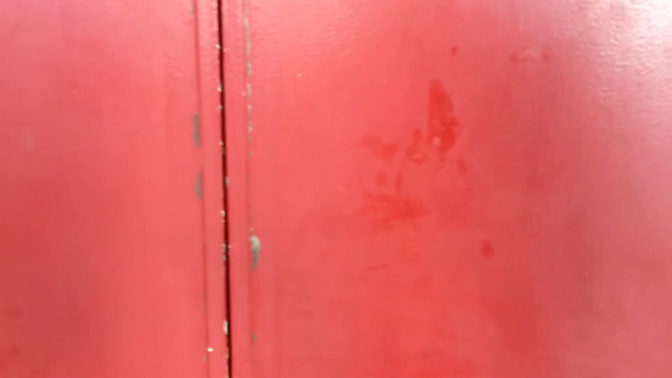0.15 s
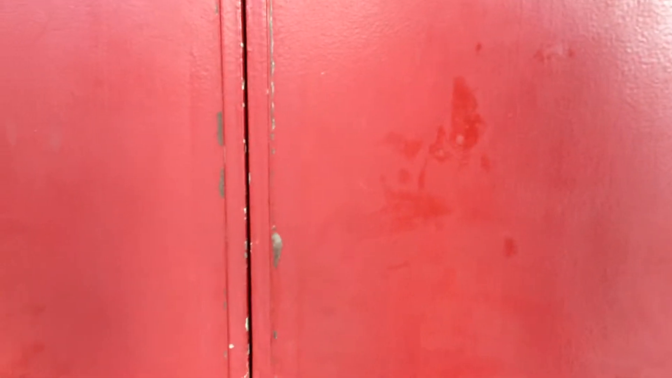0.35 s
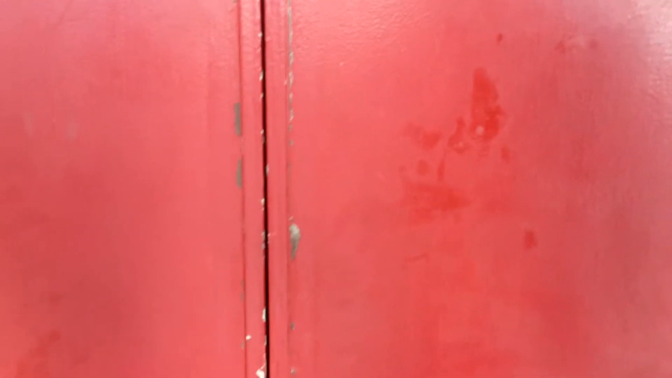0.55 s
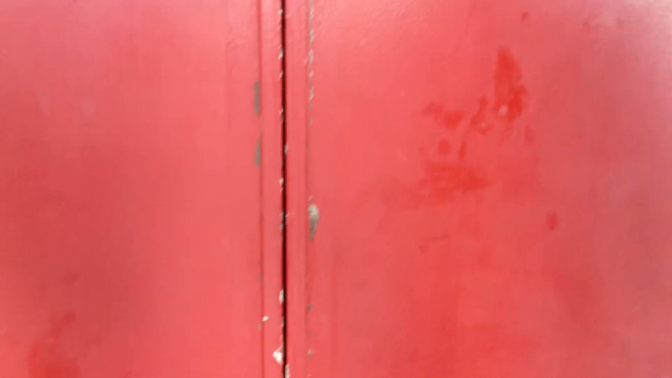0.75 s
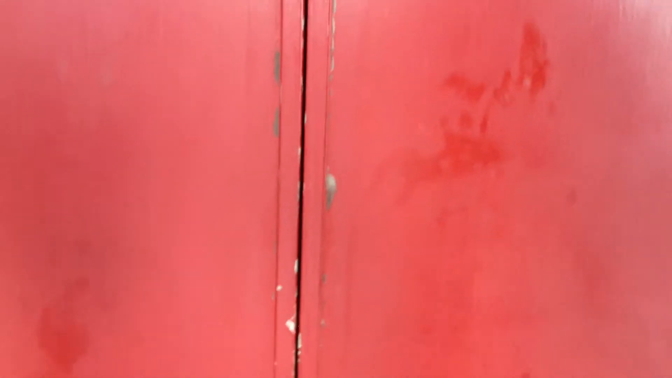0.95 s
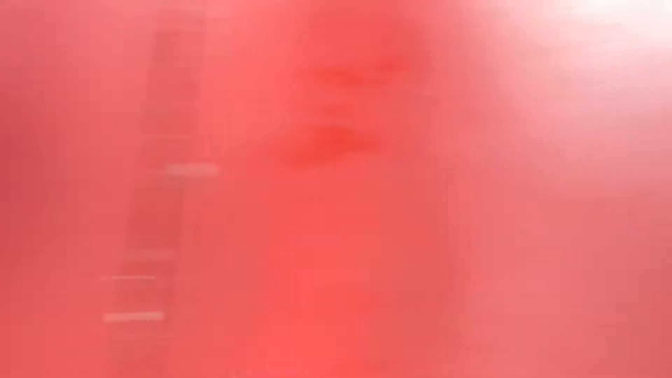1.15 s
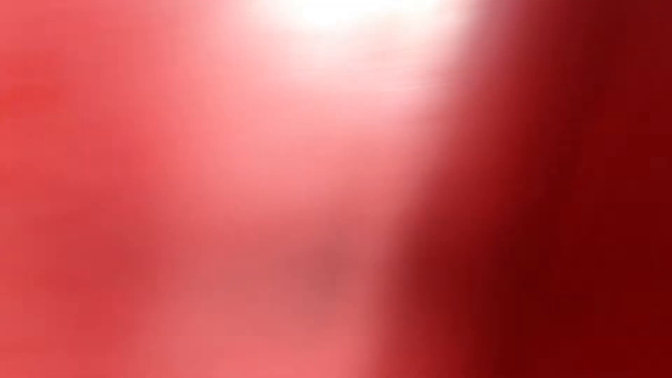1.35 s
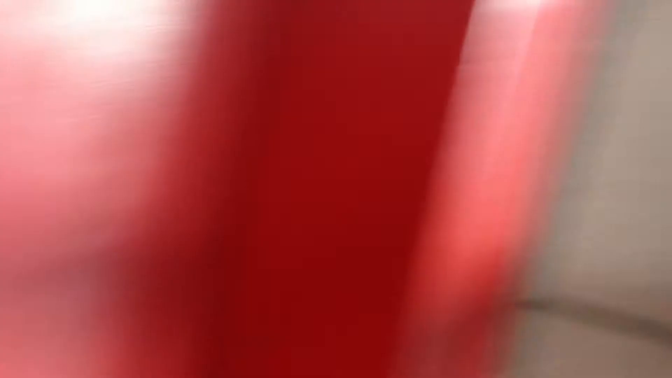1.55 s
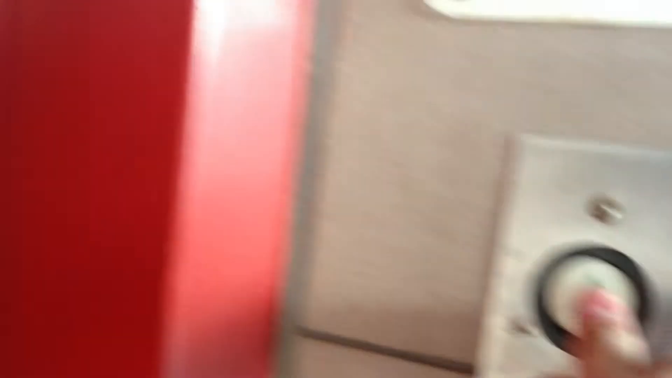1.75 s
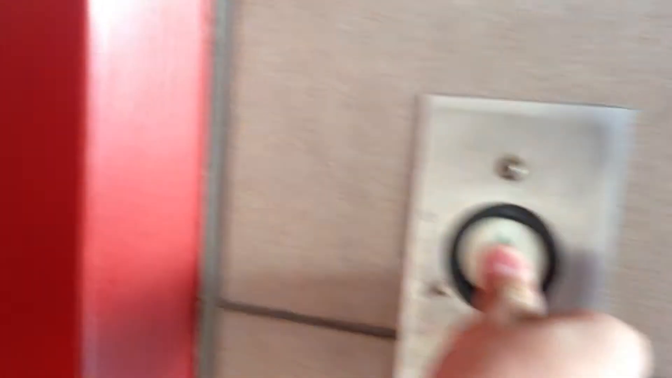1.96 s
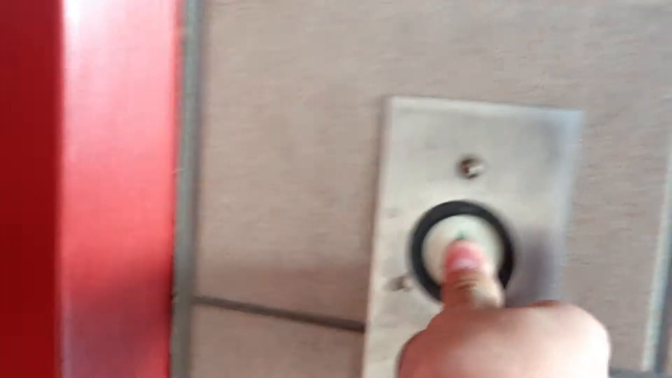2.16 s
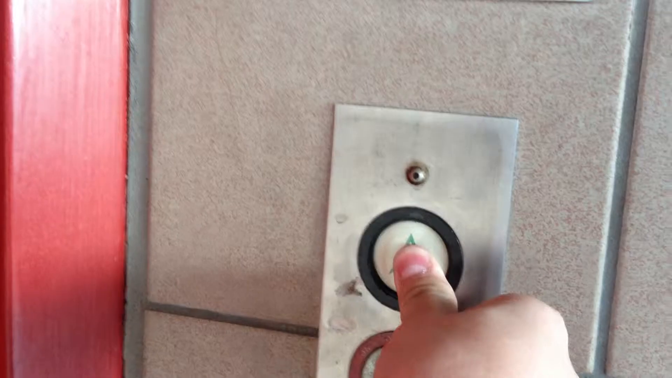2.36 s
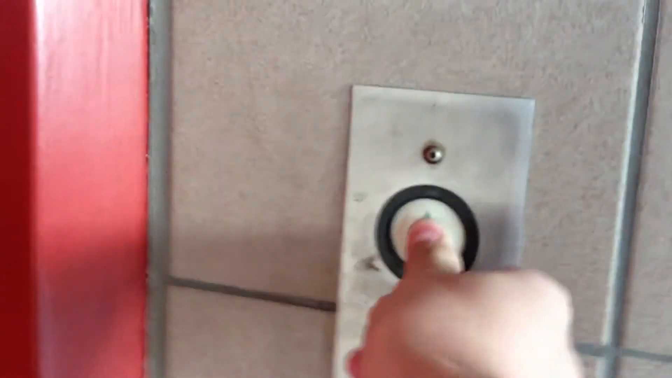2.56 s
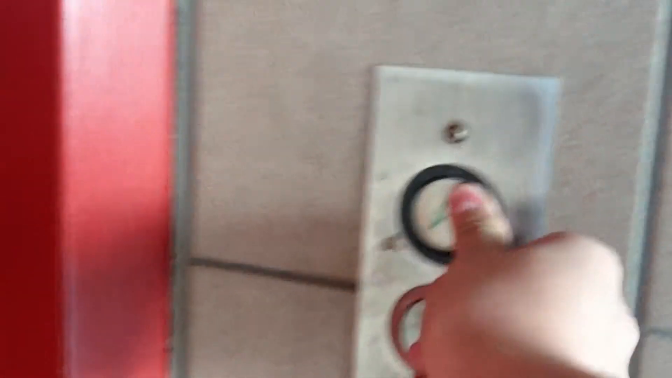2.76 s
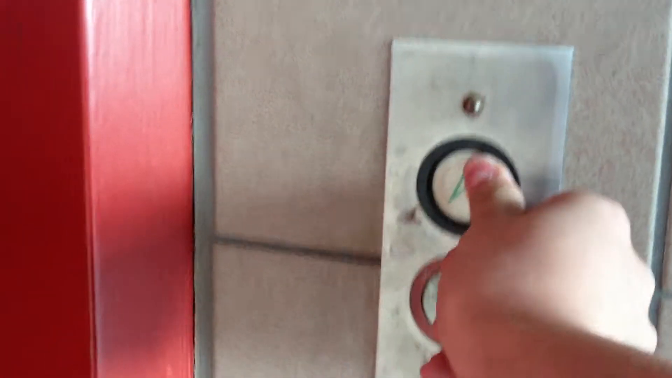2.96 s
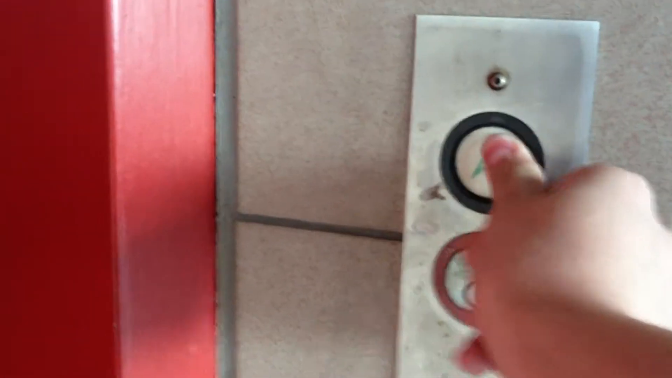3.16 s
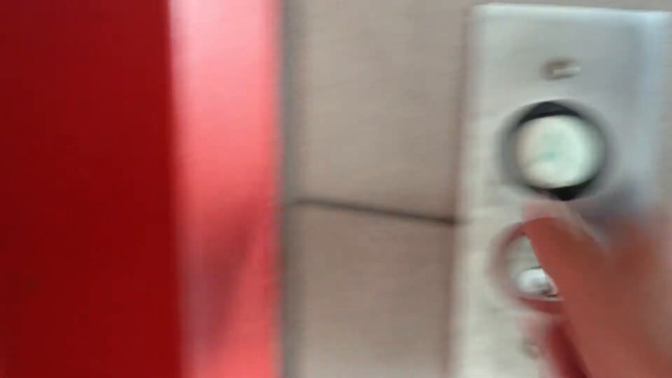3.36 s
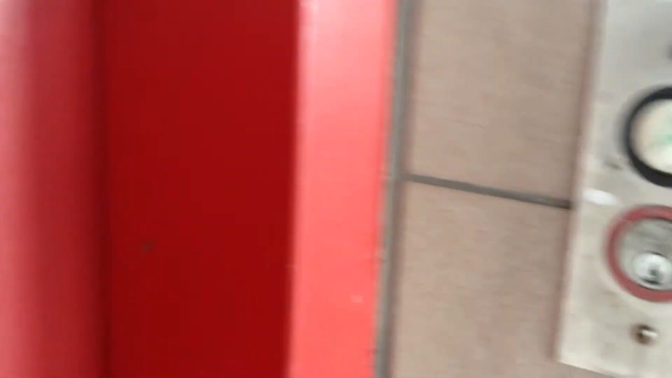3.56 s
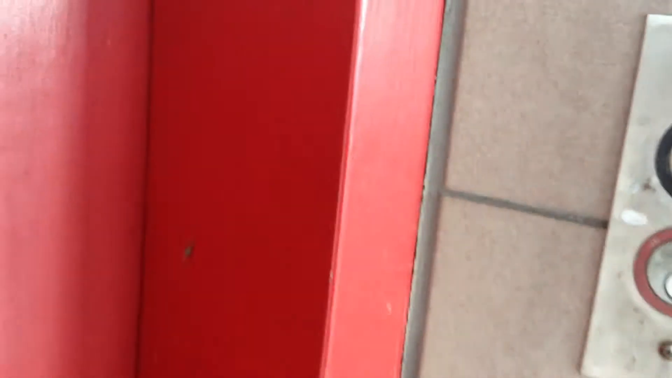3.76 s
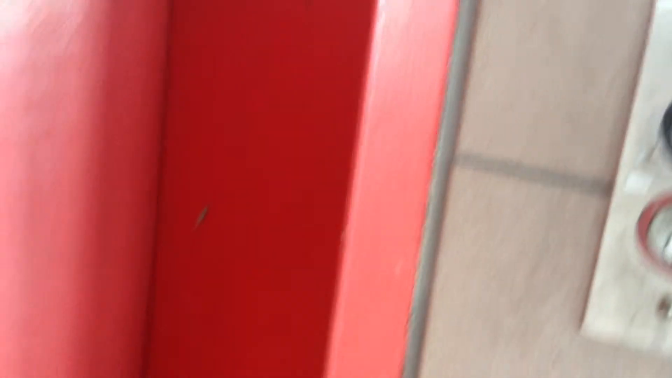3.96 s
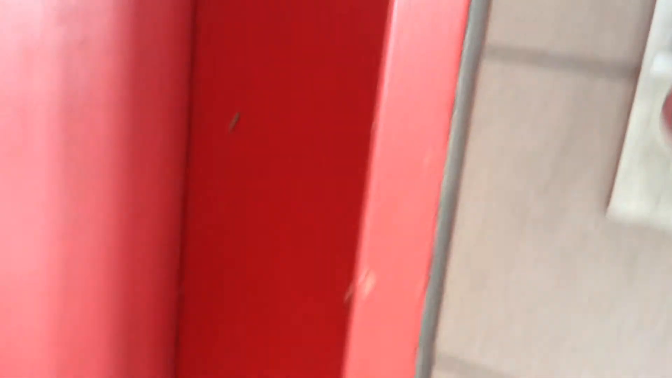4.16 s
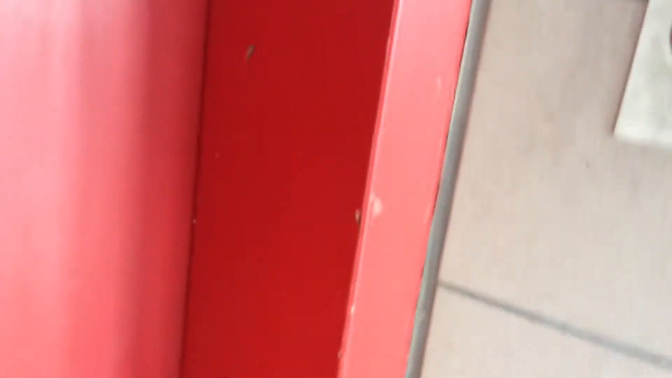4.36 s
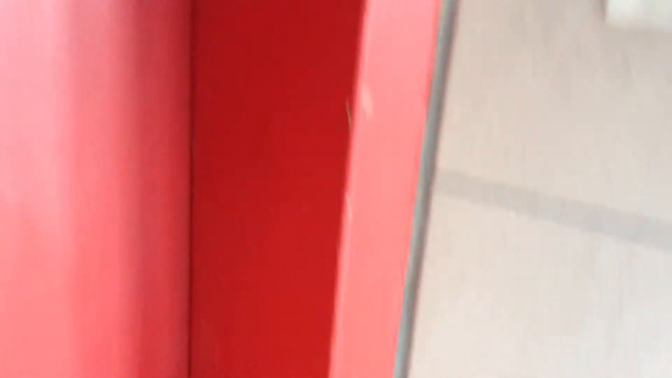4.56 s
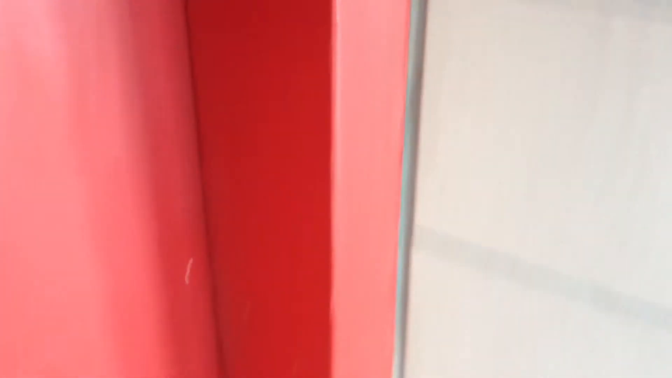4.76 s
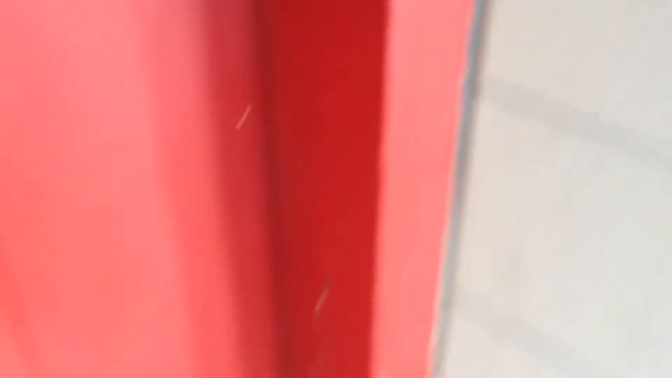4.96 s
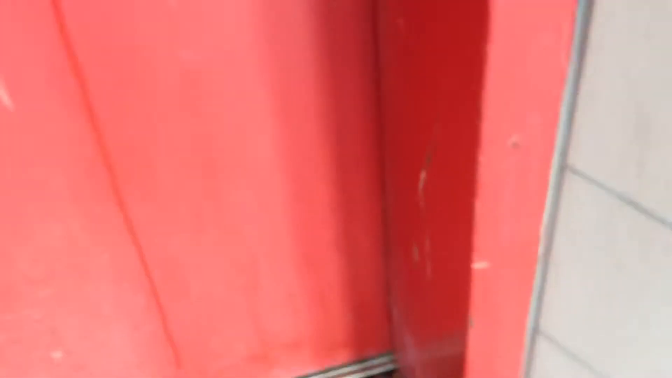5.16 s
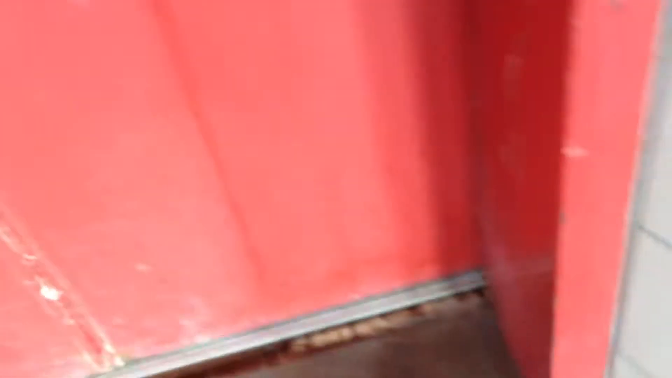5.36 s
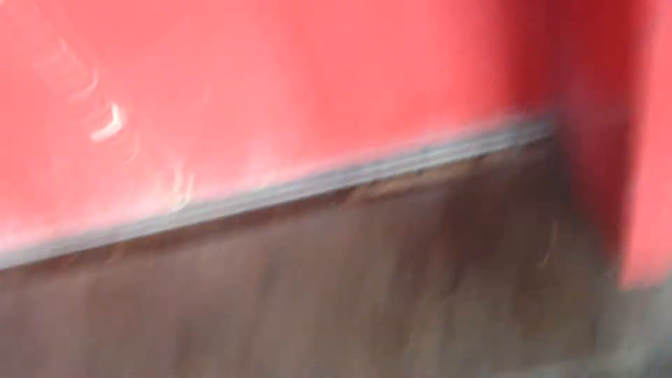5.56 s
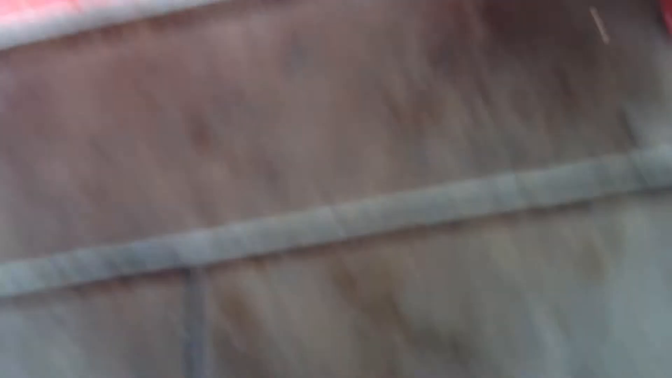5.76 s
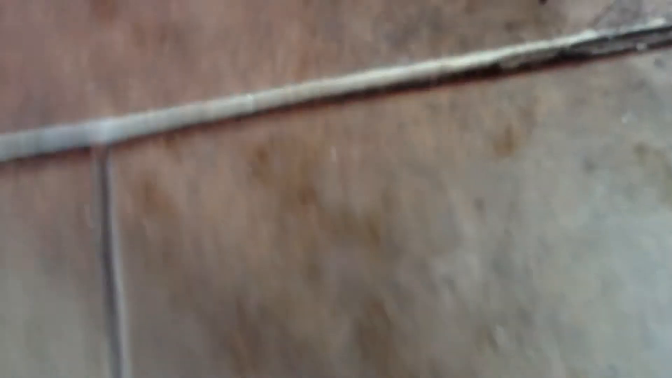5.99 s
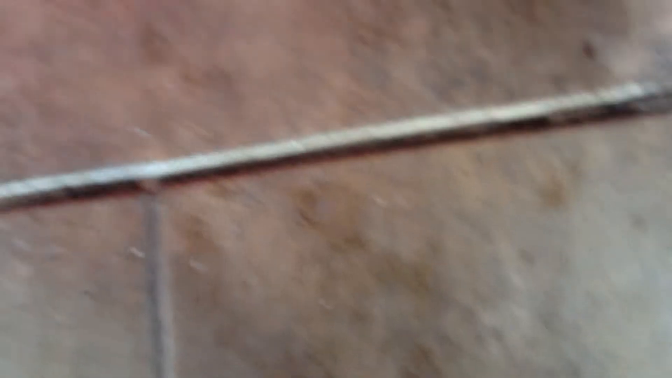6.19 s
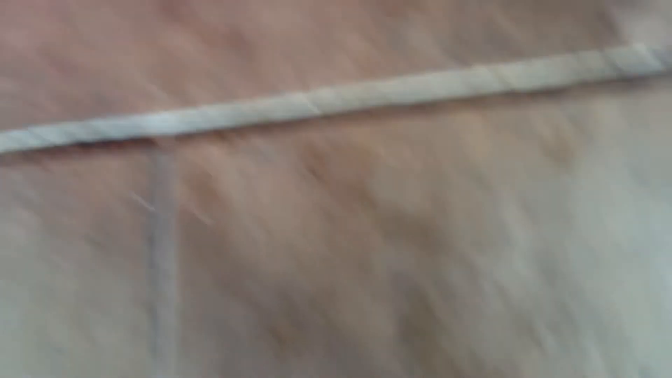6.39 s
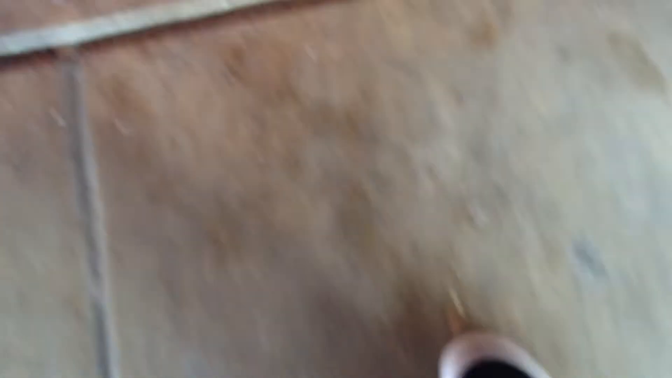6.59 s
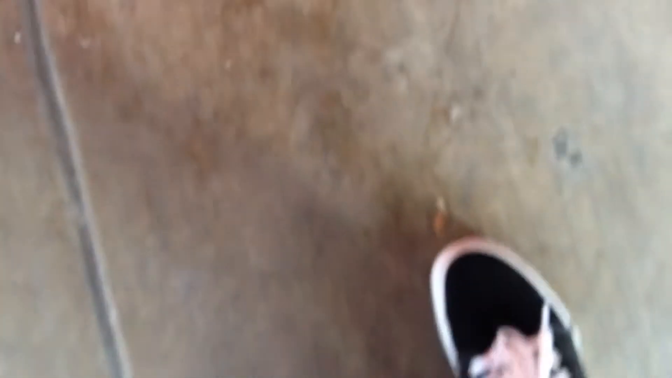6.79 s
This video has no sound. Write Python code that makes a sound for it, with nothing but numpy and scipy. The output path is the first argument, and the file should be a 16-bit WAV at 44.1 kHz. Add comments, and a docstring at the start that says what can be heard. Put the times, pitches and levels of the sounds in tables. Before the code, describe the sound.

An elevator call button clicks once, then is jabbed rapidly several times, over a low outdoor rumble and a distant engine gathering speed.

```python
"""A steel elevator call button, outdoors, is pressed once and then jabbed several times in a row.
Each impact excites the modes of the button and its panel, and a tiled porch reverberates.
Behind, an engine gathers speed, its orders sweeping through standing waves, over rumble, hiss and
far drones. Friction gives a faint squeal at first and scuffs of clothes and shoes later;
something ticks close by, and a sole taps the tiles."""
import sys
import numpy as np
from scipy import signal
from scipy.fft import rfft, irfft, next_fast_len
from scipy.io import wavfile
from scipy.ndimage import map_coordinates

SR = 44100
rng = np.random.default_rng(int(sys.argv[2]) if len(sys.argv) > 2 else 0)


def file_out(sig):
    """Save sig as 16-bit WAV at sys.argv[1]."""
    # one column per channel
    cols = np.atleast_2d(sig).T
    # limit, then scale
    lim = np.clip(cols, -1, 1)
    pcm = np.round(lim * 32767).astype(np.int16)
    wavfile.write(sys.argv[1], SR, pcm)


N = 301203

# treble modes of the button: f/Hz, bandwidth/Hz, level/dB
SNAP_MODES = [(10940, 2000, -3), (11580, 370, 0.5), (13060, 1800, 0.5), (14200, 730, 4.5), (15300, 560, 0)]


def amp(db):
    """Amplitude ratio of a level in decibels."""
    return 10 ** (np.asarray(db) / 20)


def unit(x):
    """Normalisation to rms 1."""
    return x / np.sqrt(np.mean(x ** 2) + 1e-20)


def along(points, hz):
    """Interpolation of (f/Hz, value) points on a logarithmic frequency axis."""
    f, values = np.transpose(points)
    return np.interp(np.log(hz + 1), np.log(f + 1), values)


def curves(rows):
    """Linear interpolation, sample by sample, of each column after t/s."""
    times, *columns = np.transpose(rows)
    return [np.interp(np.arange(N) / SR, times, column) for column in columns]


def ramp(at, length):
    """A smooth step from 0 to 1 around a moment."""
    return .5 + .5 * np.tanh((np.arange(N) / SR - at) / length)


def bell(at, half_width):
    """A Gaussian envelope of height 1 around a moment."""
    return np.exp(-((np.arange(N) / SR - at) / half_width) ** 2)


def wobble(rate):
    """Smooth random modulation, with rate knots a second."""
    return map_coordinates(rng.standard_normal(int(N * rate / SR) + 4), [np.arange(N) * rate / SR])


def filtered(x, response):
    """Linear filtering: the spectrum of x times a frequency response."""
    size = next_fast_len(len(x) + SR // 4)
    return irfft(rfft(x, size) * response(np.fft.rfftfreq(size, 1 / SR)), size)[:len(x)]


def resonate(x, modes):
    """Modal superposition: x drives resonators (f/Hz, bandwidth/Hz, level/dB) of alternating sign."""
    return filtered(x, lambda f: sum(
        (-1) ** k * amp(db) * 1j * f * width / (centre ** 2 - f ** 2 + 1j * f * width)
        for k, (centre, width, db) in enumerate(modes)))


def noise(spectrum):
    """White noise shaped to a spectrum (f/Hz, level/dB), at rms 1."""
    return unit(filtered(rng.standard_normal(N), lambda hz: amp(along(spectrum, hz))))


def tone(hz, rough, rate, smear=1):
    """A tone of rms 1 whose amplitude and phase waver in transit; smear spreads its phase, in cycles."""
    phase = 2 * np.pi * (np.cumsum(hz) / SR + smear * rng.standard_normal())
    in_phase = (1 + rough * wobble(rate)) * np.sin(phase)
    quadrature = rough * wobble(rate) * np.cos(phase)
    return unit(in_phase + quadrature)


def add(track, s, sound):
    """Superposes a short sound on a track at time s."""
    part = track[round(s * SR):][:len(sound)]
    part += sound[:len(part)]


def surroundings():
    """Broadband noise in four bands; the air dulls as the microphone tips towards the ground."""
    # spectra: f/Hz, relative density/dB
    street_bass = [(25, -25), (40, -12), (55, -10), (80, -2), (100, 2), (150, -11), (300, -60)]
    distant_rumble = [(50, -70), (80, -34), (105, -13), (135, -2.5), (175, -3), (230, -6), (290, -6),
                      (370, -7), (425, -16.5), (600, -59), (1200, -92)]
    air_facing_wall = [(260, -33), (450, -3), (748, 0), (841, -3), (1030, -3), (1240, -1.5), (1400, -3),
                       (1890, -1.5), (3300, -16.5), (4290, -23.5), (7260, -120)]
    air_facing_ground = [(260, -37), (450, -4), (596, -8), (1420, -12.5), (1550, -15), (2030, -19),
                         (2760, -18), (4200, -22.5), (5460, -70), (9240, -120)]
    hiss_spectrum = [(1760, -54), (3000, -19), (3630, -8), (5330, 2.5), (7870, -21), (9940, -26.5),
                     (12900, -17.5), (14700, -25.5), (15400, -16)]
    # t/s, air level/dB, hiss level/dB
    ambient_levels = [(0.0, -54, -57), (0.78, -52.5, -56), (2.47, -52, -57.5), (3.1, -52.5, -54),
                      (3.46, -52, -57), (5.23, -50, -55.5), (5.84, -51, -56), (6.83, -49.5, -54.5)]
    # t/s, level/dB
    rumble_levels = [(0, -50), (1.1, -49.5), (1.8, -45), (2.35, -49), (3.0, -45), (4.4, -48.5),
                     (5.4, -48.5), (6.1, -46.5), (6.83, -44.5)]
    air_db, hiss_db = curves(ambient_levels)
    tilt = ramp(5.6, 0.19)
    air = np.sqrt(1 - tilt) * noise(air_facing_wall) + np.sqrt(tilt) * noise(air_facing_ground)
    rumble = amp(curves(rumble_levels)[0] + 2.1 * wobble(15)) * noise(distant_rumble)
    bass = amp(-67) * noise(street_bass)
    air *= amp(air_db + 0.5 + 0.35 * wobble(8.5))
    hiss = amp(hiss_db + 0.72) * noise(hiss_spectrum)
    return bass + rumble + air + hiss


def drones():
    """Far machines radiate single tones that swell and fade, each sinking slowly in frequency."""
    # start t/s, end t/s, middle f/Hz, level/dB
    hums = [(-.1, 0.34, 189, -53.5), (-.1, 0.34, 91.4, -58), (0.16, 0.71, 259.6, -55.5),
            (0.437, 0.903, 167.1, -50.5), (0.667, 0.872, 296, -52.5), (1.143, 1.3, 295, -45.5),
            (1.15, 1.335, 146, -48), (1.437, 2.719, 146, -52), (1.679, 2.185, 169, -47),
            (1.752, 1.979, 192.3, -42.5), (2.039, 2.183, 185.4, -43), (2.777, 3.018, 170.7, -43),
            (2.293, 2.746, 171.2, -51)]
    t, track = np.arange(N) / SR, np.zeros(N)
    for start, end, hz, db in hums:
        swell = ramp(start + 0.026, 0.008) * (1 - ramp(end - .03, 0.0075))
        sag = 1 - .06 * (t - (start + end) / 2)  # 6 % a second
        track += amp(db) * swell * tone(hz * sag, rough=0.49, rate=20)
    return track


def squeal():
    """Friction sustains a thin, hoarse, rising tone; its harmonics die before the fundamental."""
    # t/s, f/Hz, level/dB
    glide = [(.62, 1990, -78), (.76, 2097, -57), (.85, 2160, -52.5), (.95, 2230, -53), (1.01, 2290, -60),
             (1.07, 2330, -73)]
    # harmonic number, loudest at t/s, half-width/s, level/dB
    harmonics = [(2, .88, .03, -62), (3, .77, 0.13, -65.5)]
    hz, db = curves(glide)
    sounding = ramp(0.65, .03) * (1 - ramp(1.4, .02))
    track = amp(db) * tone(hz, rough=.55, rate=160)
    for multiple, s, half_width, level_db in harmonics:
        track += amp(level_db) * bell(s, half_width) * tone(multiple * hz, rough=1.2, rate=250)
    return sounding * track


def contact(modes, rattle, t60):
    """Impact excitation: an impulse and decaying chatter drive modes that vary by blow; peak 1."""
    t = np.arange(SR // 16) / SR
    force = rattle * rng.standard_normal(len(t)) * amp(-60 * t / t60)
    force[0] += 1
    varied = [(hz * rng.normal(1, 0.012), width, db + rng.normal(0, 1.5)) for hz, width, db in modes]
    sound = resonate(force, varied)
    return sound / np.abs(sound).max()


def click(db, snap_db, knock_db, chatter_db, top_hz=6520, pitch=1, wet_db=-9.5):
    """Free vibration of the struck button and panel; by default the thumb damps and shields the ring."""
    # f/Hz, bandwidth/Hz, level/dB
    button_modes = [(4590, 320, -9.5), (5170, 460, 4.5), (5650, 600, 0), (6070, 330, -2), (6870, 360, -12),
                    (7000, 520, -17)]
    panel_modes = [(630, 210, 17), (966, 260, 17), (1430, 200, 14), (2000, 310, 18), (3670, 430, 8.5)]
    t = np.arange(SR // 16) / SR
    band = signal.butter(4, [pitch * 4270, top_hz], "bandpass", fs=SR, output="sos")
    tuned = [(pitch * hz, width, level) for hz, width, level in button_modes]
    ring = signal.sosfilt(band, contact(tuned, rattle=amp(chatter_db), t60=0.026))
    snap = amp(snap_db) * contact(SNAP_MODES, rattle=0.85, t60=0.015)
    knock = amp(knock_db) * contact(panel_modes, rattle=.6, t60=.07)
    onset = 1 - np.exp(-t / 0.00016)  # softened by the thumb
    return porch(amp(db + 4) * onset * (ring + snap + knock), wet_db)


def porch(x, wet_db):
    """Reverberation: tiled walls and the steel door add an exponentially decaying diffuse tail."""
    # f/Hz, T60/s
    decay_times = [(300, 0.44), (2000, 0.47), (3500, 0.39), (5200, 0.19), (7000, 0.24), (9000, 0.15),
                   (13000, 0.2)]
    # f/Hz, level/dB
    tail_colour = [(2000, -2.5), (4400, -4.5), (5300, 1.5), (6700, 6), (8300, 6), (9700, -2), (11500, 9),
                   (14000, -8.5)]
    hz, t, spectra = signal.stft(rng.standard_normal(SR // 3), SR, nperseg=256)
    tail_db = along(tail_colour, hz)[:, None] - 60 * t / along(decay_times, hz)[:, None]
    tail = signal.istft(spectra * amp(tail_db), SR, nperseg=256)[1]
    impulse_response = np.concatenate([[1], np.zeros(SR // 300), amp(wet_db) * tail / np.linalg.norm(tail)
                                       ])
    return signal.fftconvolve(x, impulse_response)


def squeak():
    """Friction noise briefly drives a resonance of the button's rim, with a weak treble rasp."""
    rim_hz, half_width_s = 4900, 0.0037
    t = np.arange(SR // 16) / SR
    friction = rng.standard_normal(len(t))
    rim = unit(resonate(resonate(friction, [(rim_hz, 450, 0)]), [(rim_hz, 900, 0)]))
    rasp = amp(-11.5) * unit(resonate(friction, SNAP_MODES))
    return (rim + rasp) * np.exp(-((t - t.mean()) / half_width_s) ** 2)


def button():
    """Impact and rebound: the button rubs, lands and bounces, and its switch springs over."""
    # thumb drives it home: t/s, level/dB, chatter/dB, knock/dB, squeak/dB, squeak lead/s,
    # bounce delay/s, bounce re landing/dB, frequency ratio, snap/dB
    presses = [(1.6786, -24.5, -21, -28, -63, .0055, 0.01, -19, 0.98, -15),
               (2.643, -17, -13, -23, -30, 0.0029, 0.015, -2, .96, -11),
               (2.727, -21, -17, -35, -48, 0.0049, 0.0041, -8, 1, -14),
               (2.9146, -14, -6, -22, -27, .0062, .004, -17, 0.995, -9),
               (3.106, -16, -17, -24, -37, 0.0051, 0.0112, -4, 1.004, -10.5),
               (3.3154, -15, -20, -25, -29.5, 0.0056, 0.015, -23, 1, -10)]
    # switch springs over, undamped and brighter: t/s, level/dB, chatter/dB, frequency ratio,
    # snap/dB, knock/dB
    springs = [(1.726, -10, -32, 0.97, -7, -21.5), (2.742, -16, -24, 0.967, -4.5, -21),
               (2.9576, -17, -19.5, 0.987, -3, -17), (3.1682, -20, -8, 1, 2, -16.5)]
    # loose button rattles under the thumb: t/s, level/dB
    touches = [(1.666, -42), (2.5701, -41), (2.6062, -33), (2.8758, -26), (3.2395, -40), (3.258, -41),
               (3.294, -30.5)]
    # colour of the clicks at the microphone: f/Hz, gain/dB
    click_colour = [(2400, 0), (3050, -3), (3650, 4.5), (4200, 0.5), (5200, -1.5), (6800, 1), (7800, 0.5),
                    (8800, 2.5), (9700, -9), (10800, -1.5), (12700, 2), (15000, -3)]
    track = np.zeros(N)
    for s, db, chatter_db, knock_db, squeak_db, lead, delay, bounce_db, pitch, snap_db in presses:
        rub = amp(squeak_db) * squeak()
        add(track, s - lead - len(rub) / 2 / SR, rub)
        add(track, s, click(db, snap_db, knock_db, chatter_db, pitch=pitch))
        bounce = click(db + bounce_db, snap_db=-7.5, knock_db=-16.5, chatter_db=-23.5, pitch=1.044)
        add(track, s + delay, bounce)
    for s, db, chatter_db, pitch, snap_db, knock_db in springs:
        for delay, drop_db in [(0, 0), (0.0034, 7.5)]:  # blow, then rebound
            blow = click(db - drop_db, snap_db, knock_db, chatter_db, top_hz=9600, pitch=pitch, wet_db=-11)
            add(track, s + delay, blow)
    for s, db in touches:
        add(track, s, click(db, snap_db=-10.5, knock_db=-16, chatter_db=-18))
    return filtered(track, lambda hz: amp(along(click_colour, hz)))


def engine():
    """Resonance: orders of the firing rate swell as they sweep through standing waves between walls."""
    # it pulls, changes gear near 3 s and pulls again: t/s, firing f/Hz
    firing_rate = [(2.2, 59.8), (2.47, 57.04), (2.56, 57.73), (2.74, 56.1), (2.97, 61.67), (3.06, 54.5),
                   (3.19, 58.9), (3.23, 57.3), (3.77, 63.42), (4.51, 69), (5.33, 72.9), (5.85, 73.63),
                   (6.42, 75.27), (6.54, 74.7), (6.83, 75.5)]
    # t/s, level/dB
    effort = [(2.0, -75), (2.3, -56), (2.6, -50), (2.95, -46.5), (3.4, -46.5), (3.7, -46.5), (4.25, -47.5),
              (4.9, -49), (5.65, -46), (6.05, -49), (6.16, -44.5), (6.63, -43), (6.83, -53)]
    # the whole hum dips briefly: t/s, half-width/s, depth/dB
    dips = [(2.987, 0.021, 1), (4.387, 0.071, 7.5), (6.068, 0.04, 3.5), (6.708, 0.035, 17)]
    # multiple of the firing rate, level/dB
    orders = [(1, -6), (2, -1), (2.5, -15.5), (3, 2.5), (3.5, -7), (4, 1), (4.5, -15.5), (5, 0), (5.5, -11),
              (6, -5)]
    # one order fades for a moment: t/s, half-width/s, multiple, depth/dB
    fades = [(3.277, 0.085, 3, 11), (3.464, 0.039, 4, 7), (3.675, 0.064, 3, 13), (4.296, 0.1, 2, 6),
             (4.104, 0.086, 5, 30), (4.347, 0.17, 3.5, 8), (5.237, 0.24, 4, 19), (5.3, 0.48, 6, 5),
             (5.76, 0.13, 4, 19), (6.35, 0.78, 2, 4), (6.422, 0.24, 3, 9.5)]
    # f/Hz, bandwidth/Hz, level/dB
    standing_waves = [(126.6, 8.1, 1), (144.65, 11.5, 7.5), (177.7, 11.5, 0), (201.3, 41, 2.5),
                      (218, 23, 0.5), (246, 32, -1), (284, 25.5, 3), (298.7, 15.7, 5), (340, 20, -7),
                      (343, 96, 2), (404.8, 13, 2), (450.8, 22.5, -8)]
    firing_hz, = curves(firing_rate)
    effort_db = curves(effort)[0] - sum(depth * bell(s, span) for s, span, depth in dips)
    track = np.zeros(N)
    for multiple, db in orders:
        hz = multiple * firing_hz
        modal_power = sum((amp(peak_db) / (1 + (2 * (hz - centre) / width) ** 2)) ** 2
                          for centre, width, peak_db in standing_waves)
        lift = np.sqrt(modal_power + amp(-21) ** 2)  # with a floor between the resonances
        fade_db = sum(depth * bell(s, span) for s, span, order, depth in fades if order == multiple)
        partial = tone(hz, rough=.25, rate=22, smear=0.16)  # wall delays blur the firing pulse
        track += amp(db - fade_db + 0.9 * wobble(6.3)) * lift * partial
    return amp(effort_db) * track


def ticks():
    """Tiny, heavily damped impacts, so close that only direct sound is heard."""
    # t/s, level/dB, relative treble/dB
    impacts = [(2.466, -53, 2), (5.2, -47, -14), (5.554, -44, -7), (5.6, -36, -14), (5.6025, -41, -7),
               (5.604, -18.5, -28)]
    track = np.zeros(N)
    band = signal.butter(3, [4550, 8400], "bandpass", fs=SR, output="sos")
    for s, db, treble_db in impacts:
        ring = contact([(5160, 840, 26), (6860, 1100, -13), (7525, 570, -13)], rattle=0.045, t60=0.012)
        treble = amp(treble_db) * contact([(11220, 1700, 1), (14000, 1600, -4)], rattle=.05, t60=.004)
        add(track, s, amp(db + 8) * (signal.sosfilt(band, ring) + treble))
    return track


def scuffs():
    """Sliding friction of clothes and shoes gives short swells of grainy noise."""
    # t/s, half-width/s, level/dB, relative treble/dB
    strokes = [(3.801, 0.05, -49.5, -20), (3.85, 0.0095, -44.5, -21), (4.532, 0.053, -55.5, -24),
               (5.33, .009, -50.5, -15), (5.569, 0.019, -57, -3), (5.617, 0.0093, -48, -9),
               (5.949, 0.093, -56, -14), (6.086, 0.06, -50.5, -21), (6.75, 0.03, -47.5, -8),
               (6.808, 0.043, -58, -8)]
    t, track = np.arange(SR // 4) / SR, np.zeros(N)
    for s, half_width, db, treble_db in strokes:
        grains = rng.standard_normal(len(t)) * rng.standard_normal(len(t))
        rub = unit(resonate(grains, [(5280, 1100, 13.8), (5970, 1900, 6.1)]))
        treble = amp(treble_db) * unit(resonate(grains, [(11100, 1600, 0), (14000, 4400, 0)]))
        swell = np.exp(-2 * ((t - t.mean()) / half_width) ** 2)
        add(track, s - t.mean(), amp(db) * (rub + treble) * swell)
    return track


def shoe_tap():
    """The impact of a sole on the tiles excites two damped modes: a dull knock."""
    # t/s, peak level/dB
    footfalls = [(5.568, -36)]
    track = np.zeros(N)
    for s, db in footfalls:
        add(track, s, amp(db) * contact([(790, 290, 8.9), (998, 300, 2.4)], rattle=.1, t60=0.03))
    return track


def scene():
    """Superposition of all sources at one point."""
    foreground = button() + ticks() + shoe_tap() + scuffs()
    return (foreground + squeal() + engine() + drones() + surroundings())[None]


def record(dry):
    """Band limiting: a steep low-pass filter removes the highest treble."""
    cutoff_hz = 15320
    return np.array([filtered(x, lambda hz: 1 / (1 + (hz / cutoff_hz) ** 110)) for x in dry])


dry = scene()
out = record(dry)
file_out(out)
```